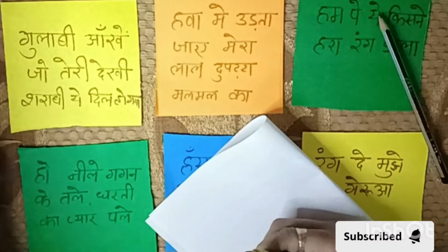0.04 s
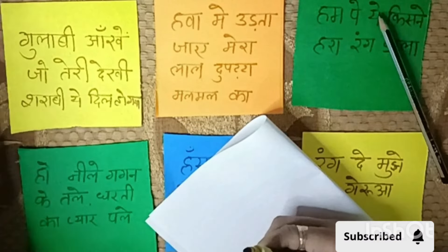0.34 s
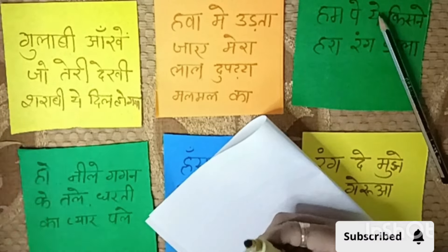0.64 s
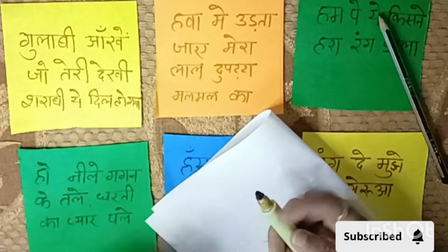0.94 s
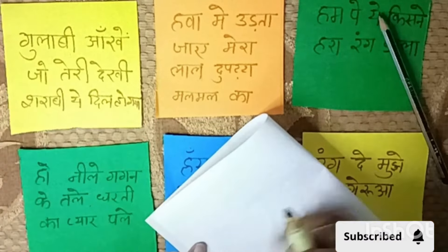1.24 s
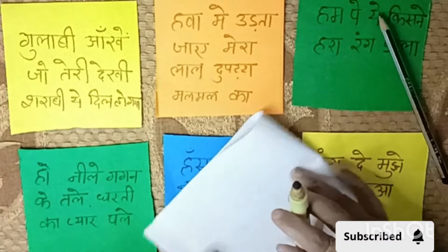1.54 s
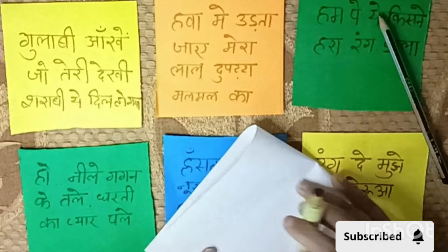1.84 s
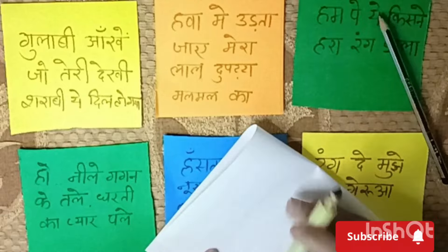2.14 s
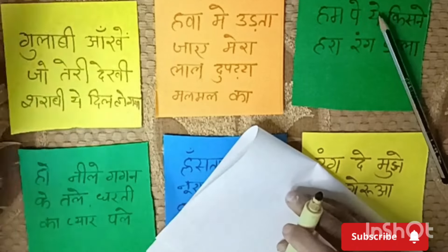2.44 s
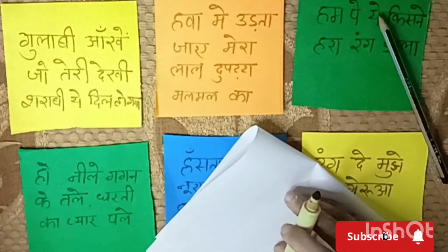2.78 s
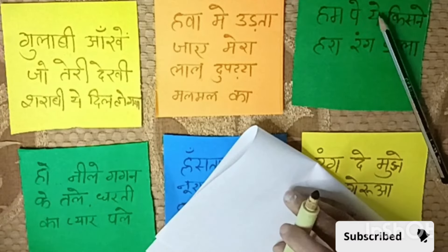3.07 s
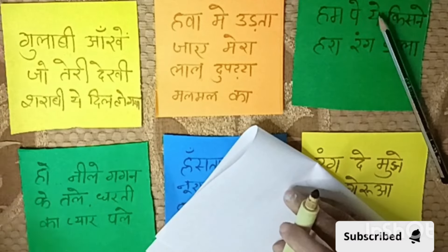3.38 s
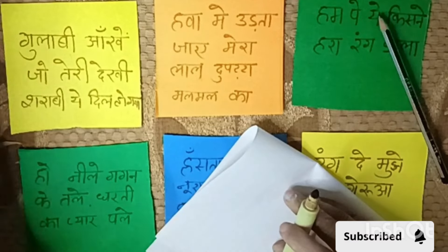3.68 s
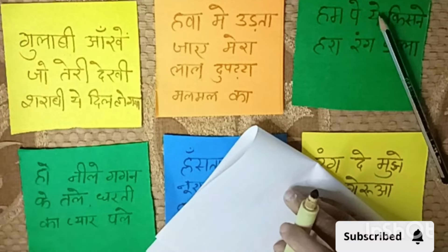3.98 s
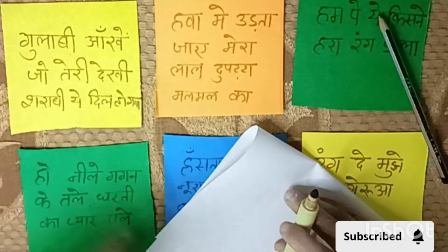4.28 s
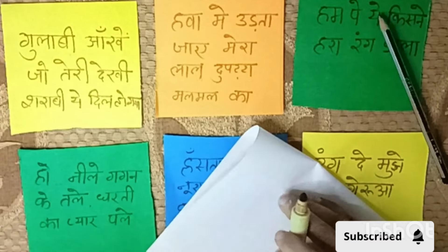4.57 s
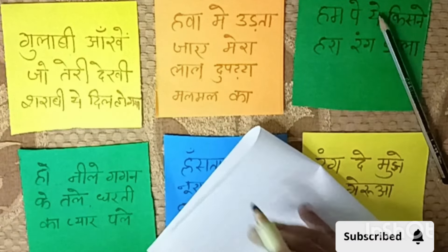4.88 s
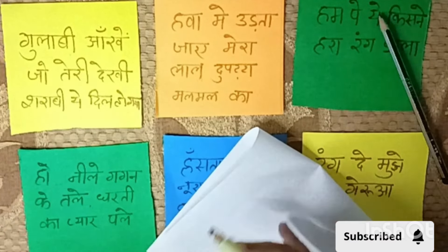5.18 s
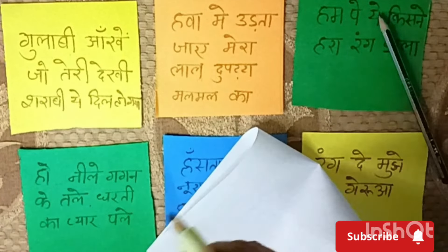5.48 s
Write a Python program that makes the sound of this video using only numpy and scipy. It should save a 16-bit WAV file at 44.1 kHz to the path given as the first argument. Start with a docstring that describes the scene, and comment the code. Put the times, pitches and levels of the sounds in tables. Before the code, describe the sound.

It opens with a quick cluster of hard knocks and clacks as things are set down on a table, the loudest at the very start and around 0.3 seconds, with a tiny thin squeak between them. From about 0.8 to 1.9 seconds a sheet of paper slides over the table in short, soft, hissing and scraping strokes. Just after 2 seconds it gives a sharp snap, followed by faint low puffs of air. After a lull, a single hard knock lands at 3.5 seconds, with a brief swish of paper. Faint taps come around 4 seconds. From 4.6 seconds to the end at about 5.6, sliding strokes mix with light snaps and pen taps, growing busier. Everything is close to the microphone, with the short echo of a bare room and a steady low rumble and faint fan-like hum beneath.

```python
"""Paper sliding on a table

Friction makes a sheet of paper hiss and scrape in short strokes over a hard table, close to a
phone. Things set down excite damped modes, heard as hard knocks and clacks that reverberate in
a bare room; the sheet snaps as it buckles or is tapped by a hand with a pen. Under it all lies a
low rumble with a faint hum, like that of a fan."""
import sys
import numpy as np
from scipy import signal
from scipy.fft import rfft, irfft, next_fast_len
from scipy.io import wavfile
from scipy.ndimage import map_coordinates

SR = 44100
rng = np.random.default_rng(int(sys.argv[2]) if len(sys.argv) > 2 else 0)


def file_out(sig):
    """Save sig as 16-bit WAV at sys.argv[1]."""
    # one column per channel
    cols = np.atleast_2d(sig).T
    # limit, then scale
    lim = np.clip(cols, -1, 1)
    pcm = np.round(lim * 32767).astype(np.int16)
    wavfile.write(sys.argv[1], SR, pcm)


N = 243334

# strokes of the sheet and the hand: peak_s, rise_s, fall_s, hiss_db, treble_over_hiss_db, scrape_db
PAPER_STROKES = [ (0.815, .06, 0.081, -63, 0, -65.5), (1.055, 0.036, 0.091, -58.5, 0, -64),
                 (1.22, 0.06, .07, -63.5, 4, -61), (1.299, 0.042, 0.11, -58, 3, -57),
                 (1.42, 0.055, 0.041, -51, 1.5, -55), (1.512, 0.041, 0.05, -50.5, 3, -60.5),
                 (1.594, 0.026, 0.035, -53, 4, -60), (1.715, 0.034, 0.057, -60.5, 4.5, -61),
                 (1.784, 0.11, 0.16, -60.5, 4.5, -63.5), (3.612, .016, .035, -45.5, 1.5, -57),
                 (3.702, 0.076, 0.029, -56, 0.5, -67), (4.03, .15, 0.12, -78, 0, -75),
                 (4.62, 0.102, .04, -62, -1, -65.5), (4.675, 0.04, 0.033, -63, 7.5, -75),
                 (4.892, .13, 0.067, -57.5, 2, -63), (5.03, 0.038, 0.051, -65, 6, -68),
                 (5.115, 0.034, 0.032, -60.5, 2, -64.5), (5.375, 0.027, 0.096, -49, -2.5, -60),
                 (5.43, 0.11, 0.034, -51.5, -8, -59.5), (5.51, 0.029, .05, -53.5, -4, -61), ]
# low puffs of air from things set down and from the flapping sheet: peak_s, rise_s, fall_s, level_db
AIR_PUFFS = [(0.31, .05, 0.2, -52.5), (2.17, 0.072, 0.06, -54), (2.336, 0.057, 0.027, -52),
             (3.57, .06, 0.23, -57.5)]
# spectra of light sliding, pressed sliding and fanned air: frequency_hz, density_db
HISS_SPECTRUM = [(590, -30), (1000, -20), (1300, -16), (1580, -1.5), (1710, -6), (2530, -1.5), (2840, 1.5),
                 (3150, 0.5), (5780, -5.5), (7360, -1), (10500, -11.5), (14000, -10.5), (15500, -19.5)]
SCRAPE_SPECTRUM = [(200, 4), (400, 4), (750, -1.5), (1500, -3.5), (2800, -1.5), (4000, -1.5), (8000, -23)]
AIR_SPECTRUM = [(22, -21.5), (52, 1.5), (100, -2.5), (200, -19), (600, -47)]

def paper(pan_right_db=1, treble_hz=4440, fanned_db=-2.5):
    """Sliding friction: strokes hiss, scrape and fan the air; being incoherent, they add in power."""
    power = np.zeros((3, N))
    for peak_s, rise_s, fall_s, hiss_db, treble_db, scrape_db in PAPER_STROKES:
        gains = amp([hiss_db, hiss_db + treble_db, scrape_db])
        power += np.outer(gains, swell(peak_s, rise_s, fall_s)) ** 2
    hiss, bright, scrape = np.sqrt(power)
    light_rub = friction(HISS_SPECTRUM, catches_per_s=1500, grain_db=-7)
    pressed_rub = friction(SCRAPE_SPECTRUM, catches_per_s=470, grain_db=-1)
    body = filtered(light_rub, lambda hz: 1 / (1 + (hz / treble_hz) ** 4))
    sliding = hiss * body + bright * (light_rub - body) + scrape * pressed_rub
    puffs = sum(amp(db) * swell(peak_s, rise_s, fall_s) for peak_s, rise_s, fall_s, db in AIR_PUFFS)
    air = (amp(fanned_db) * scrape + puffs) * noise(AIR_SPECTRUM)
    return sliding * amp([[-pan_right_db], [pan_right_db]]) + air


def friction(spectrum, catches_per_s, grain_db, spread_db=4, flutter_db=1):
    """Stick-slip: fibres catch at random over a smooth rub, and uneven speed flutters the level."""
    catches = rng.random(N) < catches_per_s / SR
    slips = catches * rng.standard_normal((2, N)) * amp(spread_db * rng.standard_normal(N))
    grains = unit(filtered(slips, lambda hz: causal(amp(along(spectrum, hz)))))
    rub = noise(spectrum) + amp(grain_db) * grains
    return unit(rub * amp(flutter_db * wobble(60)))


def swell(peak_s, rise_s, fall_s, drop_db=9.5, roundness=1.3):
    """Amplitude envelope of a movement that speeds up until peak_s and slows down again."""
    t = np.arange(N) / SR - peak_s
    from_peak = np.maximum(-t / rise_s, t / fall_s)
    return amp(-drop_db * np.minimum(from_peak, 10) ** roundness)


# hard impacts: start_s, thud_db, clack_db, tick_db, boom_db, contact_s
IMPACTS = [ (-0.010, 14.5, 17, -0.5, -40, 0.031), (0.095, -30.5, -4, -11, -65.5, .02),
           (0.183, -7, -10, -20, -54, 0.017), (0.203, 0.5, -26.5, -27.5, -47, 0.007),
           (0.297, 21.5, 0.5, -11.5, -39.5, 0.0046), (0.351, 1, 8, -28.5, -58.5, .009),
           (0.383, 2.5, -7, -9, -75, 0.01423), (0.41, 3, -1.5, -36, -51.5, .015),
           (3.518, 10, -7, 1, -38.5, 0.007), (3.583, -11.5, -31.5, -8, -74, .008), ]
# spectra of the hollow, hard and bright parts of an impact: frequency_hz, level_db
THUD_SPECTRUM = [(35, -17), (85, 2), (130, -11.5), (175, 5), (235, -3.5), (340, -11), (450, -5.5),
                 (600, -0.5), (760, -2), (1000, -7.5), (1200, -10.5), (1800, -17.5), (5000, -51),
                 (15000, -59)]
CLACK_SPECTRUM = [(60, -35), (400, -1.5), (800, -15), (1300, -6), (1800, -2.5), (2200, -2), (2750, -1),
                  (4000, -17), (6000, -39), (15000, -57.5)]
TICK_SPECTRUM = [(300, -28.5), (2050, -27), (2600, -1.5), (4200, 0.5), (5500, -6), (7500, -7),
                 (10500, -15.5), (13700, -16), (15500, -22)]

def knocks():
    """Impact excitation: a thing set down gives a thud, a clack and a tick, and shakes the table."""
    out = np.zeros((2, N))
    for start_s, thud_db, clack_db, tick_db, boom_db, contact_s in IMPACTS:
        voices = (THUD_SPECTRUM, thud_db), (CLACK_SPECTRUM, clack_db), (TICK_SPECTRUM, tick_db)
        colour = lambda hz: np.sqrt(sum(amp(db + along(shape, hz)) ** 2 for shape, db in voices))
        hit = strike(colour, contact_s, room_db=-2.5, push_db=-5, ripple_db=3, spacing_hz=48.9,
                     left_lead_ms=0.21)
        add(out, start_s, hit + amp(boom_db) * table_boom())
    return out


def strike(colour, contact_s, room_db, push_db, ripple_db, spacing_hz, left_lead_ms=0):
    """Source and filter: an impulse, brief chatter and their reverberation pass through close modes."""
    t = np.arange(SR) / SR
    envelope = amp(-30 * t / contact_s) * (1 - np.exp(-t / 0.0016))
    chatter = diffuse(rng.standard_normal((2, SR))) * envelope
    blow = unit(chatter) / np.sqrt(SR) + amp(room_db) * room_tail()
    blow[:, 0] += amp(push_db)
    # close modes ripple the spectrum, above the few broad ones in the bass
    knots = rng.standard_normal(size=2048)
    modes = lambda hz: amp(ripple_db * map_coordinates(knots, [hz / spacing_hz]) * hz / (hz + 900))
    delay_s = np.array([[0], [left_lead_ms]]) / 1000
    return filtered(blow, lambda hz: causal(colour(hz) * modes(hz)) * np.exp(-2j * np.pi * hz * delay_s))


def table_boom(pitch_hz=172, t60_s=0.32, attack_s=0.014):
    """Damped oscillation: the lowest mode of the table top builds up and decays exponentially."""
    t = np.arange(SR) / SR
    return np.sin(2 * np.pi * pitch_hz * t) * amp(-60 * t / t60_s) * (1 - np.exp(-t / attack_s))


# snaps and taps of paper and pen: start_s, level_db, tilt_db_per_octave, contact_s
PAPER_SNAPS = [ (1.324, -13, -4.5, 0.028), (2.06, -2.5, -2, 0.023), (2.088, 1.5, 3, 0.0093),
               (2.091, 3.5, -2.5, .016), (2.096, -7.5, 4, .008), (3.696, -23, 6.5, 0.02),
               (3.975, -40, -16, 0.037), (4.112, -30, -9, .017), (4.132, -31.5, -9, 0.051),
               (4.586, -21, -2.5, 0.049), (4.933, -22.5, -4.5, 0.04), (5.043, -19.5, -5.5, .022),
               (5.204, -30, 3, 0.023), (5.294, -14, 1.5, .024), (5.325, -11.5, 3.5, 0.04),
               (5.444, -14, 8, 0.0081), (5.499, -18.5, -1.5, 0.023), ]
# spectrum of a snap before its tilt: frequency_hz, level_db
SNAP_SPECTRUM = [(150, -22.5), (290, -17.5), (410, -3.5), (620, -14.5), (1100, -10.5), (1600, -5),
                 (2050, -5), (2450, -4.5), (2900, -1.5), (3800, -8.5), (7500, -16.5), (11000, -31),
                 (14000, -33)]

def snaps():
    """Buckling and tapping excite the sheet impulsively; a softer contact gives less treble."""
    out = np.zeros((2, N))
    octaves = lambda hz: np.log2(np.maximum(hz, 1000) / 2800)
    for start_s, level_db, tilt, contact_s in PAPER_SNAPS:
        colour = lambda hz: amp(level_db + along(SNAP_SPECTRUM, hz) + tilt * octaves(hz))
        snap = strike(colour, contact_s, room_db=-4, push_db=-7.5, ripple_db=3.5, spacing_hz=125)
        add(out, start_s, snap)
    return out


def squeak(start_s=0.187, length_s=0.088, edge_s=0.017, pitch_hz=3950, half_width_hz=260):
    """Narrow-band friction noise: something drags with a thin, rough squeak that sags in level."""
    level_db, sag_db, flutter_db = -52, 4.5, 1.5
    t = np.arange(N) / SR - start_s
    gate = np.clip(1 + np.minimum(t, length_s - t) / edge_s, 0, 1)
    gain = amp(level_db - sag_db * np.clip(t / length_s, 0, 1) + flutter_db * wobble(70))
    resonance = lambda hz: 1 / (1 + ((hz - pitch_hz) / half_width_hz) ** 4)
    return gate * gain * unit(filtered(rng.standard_normal((2, N)), resonance))


# shifts of the fingers: peak_s, level_db
FINGER_SHIFTS = [(2.842, -70), (2.915, -70), (3.043, -73)]
# spectrum of their hiss: frequency_hz, density_db
FINGER_SPECTRUM = [(2000, -10.5), (5000, -2), (8200, 0), (10500, -11), (13000, -3), (14600, 4), (15500, -5)]

def fingers(half_width_s=0.0086):
    """Light friction: each shift of the fingers is a faint swell of high hiss."""
    t = np.arange(N) / SR
    envelope = sum(amp(db) / (1 + ((t - peak_s) / half_width_s) ** 2) for peak_s, db in FINGER_SHIFTS)
    return envelope * noise(FINGER_SPECTRUM)


# reverberation times of the bare room: frequency_hz, t60_s
REVERB_TIMES = [(150, 0.45), (400, 0.55), (1000, 0.56), (2800, 0.49), (7000, 0.5), (14000, 0.55)]

def room_tail(build_s=0.0057):
    """Reverberation: a fresh diffuse tail, of energy near 1, decays exponentially in each band."""
    hz, t, bands = signal.stft(diffuse(rng.standard_normal((2, SR))), SR, nperseg=256)
    fade = amp(-60 * t / along(REVERB_TIMES, hz)[:, None]) * (1 - np.exp(-t / build_s))
    tail = signal.istft(bands * fade, SR, nperseg=256)[1][:, :SR]
    return tail / np.sqrt(SR * np.mean(fade[len(hz) // 8] ** 2))


# spectrum of the room's rumble and hiss: frequency_hz, density_db
RUMBLE_SPECTRUM = [(22, -16.5), (45, 2.5), (70, -4), (115, -4), (200, -20.5), (290, -16.5), (340, -18),
                   (460, -18.5), (600, -23.5), (1080, -30.5), (2000, -32.5), (2700, -33.5), (5000, -38),
                   (15500, -43)]
# tones of the fan-like hum: pitch_hz, level_db
HUM_TONES = [(258.4, -79.5), (301.5, -81), (398.4, -81), (446.8, -71.5)]

def background(rumble_db=-62, waver_db=1.3, drift_rad=0.19):
    """A line spectrum over broadband noise: hum tones waver in level and phase above the rumble."""
    t = np.arange(N) / SR
    hum = np.zeros(N)
    for pitch_hz, level_db in HUM_TONES:
        gain = np.sqrt(2) * amp(level_db + waver_db * wobble(4.9))
        hum += gain * np.sin(2 * np.pi * pitch_hz * t + drift_rad * wobble(2.4))
    return amp(rumble_db) * noise(RUMBLE_SPECTRUM) + hum


def amp(db):
    """Decibels to amplitude ratio."""
    return 10 ** (np.asarray(db) / 20)


def unit(x):
    """Normalisation to rms 1."""
    return x / np.sqrt(np.mean(x ** 2) + 1e-20)


def along(points, hz):
    """Interpolation of (frequency_hz, value) points on a logarithmic frequency axis."""
    frequencies, values = np.transpose(points)
    return np.interp(np.log(hz + 1), np.log(frequencies + 1), values)


def wobble(rate_hz):
    """Random modulation: a smooth curve through rate_hz knots a second."""
    knots = rng.standard_normal(int(N * rate_hz / SR) + 4)
    return map_coordinates(knots, [np.arange(N) * rate_hz / SR])


def filtered(x, response):
    """Linear filtering: the spectrum of x times a complex frequency response."""
    length = x.shape[-1]
    padded = 2 * next_fast_len(length // 2 + 4096)
    return irfft(rfft(x, padded) * response(np.fft.rfftfreq(padded, 1 / SR)), padded)[..., :length]


def causal(gain):
    """Minimum phase: the response with this gain that rings only after the blow."""
    cepstrum = irfft(np.log(np.maximum(gain, 1e-6)))
    half = len(cepstrum) // 2
    cepstrum[1:half] *= 2
    cepstrum[half + 1:] = 0
    return np.exp(rfft(cepstrum))


def diffuse(pair, first_null_hz=1000):
    """Diffuse-field coherence: two spaced microphones hear alike only in the bass."""
    angle = lambda hz: np.arccos(np.sinc(hz / first_null_hz)) / 2
    mid, side = filtered(pair, lambda hz: np.array([np.cos(angle(hz)), np.sin(angle(hz))]))
    return np.array([mid + side, mid - side])


def noise(spectrum):
    """Spectral shaping: diffuse stereo noise of rms 1 with the given colour."""
    white = diffuse(rng.standard_normal((2, N)))
    return unit(filtered(white, lambda hz: amp(along(spectrum, hz))))


def add(out, start_s, sound):
    """Superposition of a sound on out from start_s, which may lie before zero."""
    start = round(start_s * SR)
    rest = sound[:, max(-start, 0):]
    part = out[:, max(start, 0):][:, :rest.shape[1]]
    part += rest[:, :part.shape[1]]


def scene():
    """Superposition: the pressures of impacts, friction and background add."""
    return knocks() + snaps() + paper() + fingers() + squeak() + background()


# imbalance of the two microphone ports: frequency_hz, left_minus_right_db
PORT_BALANCE = [(60, -3.5), (160, 2), (1000, -1.5), (2500, -0.5), (5000, -0.5), (8500, -1), (11000, 1.5),
                (14000, -6.5), (15500, 3.5)]

def record(dry, top_hz=15650):
    """Frequency response: each microphone port colours the sound, and nothing passes above top_hz."""
    share = np.array([[0.5], [-0.5]])
    return filtered(dry, lambda hz: amp(along(PORT_BALANCE, hz) * share) * (hz < top_hz))


dry = scene()
out = record(dry)
file_out(out)
```